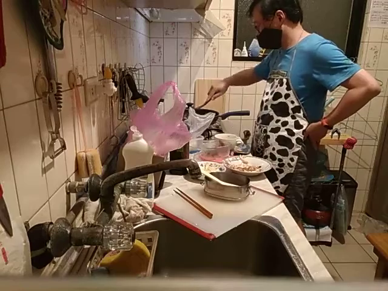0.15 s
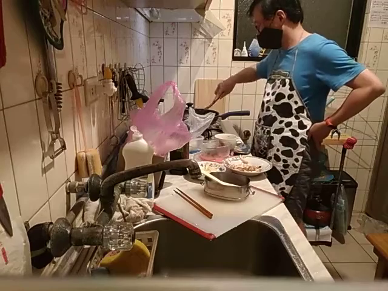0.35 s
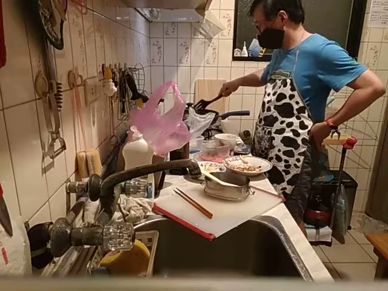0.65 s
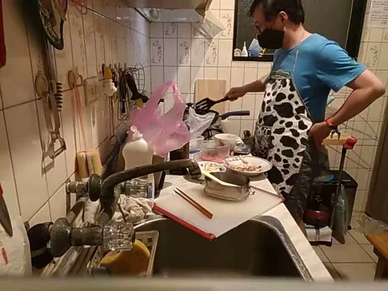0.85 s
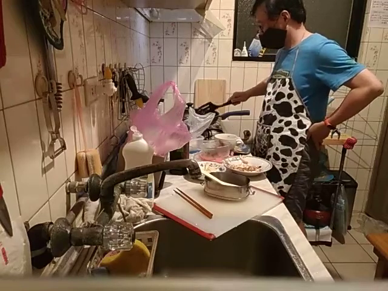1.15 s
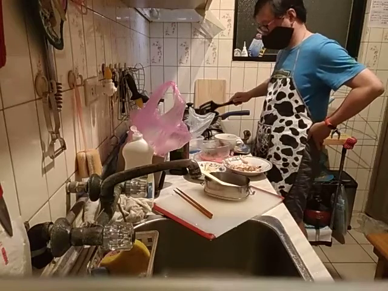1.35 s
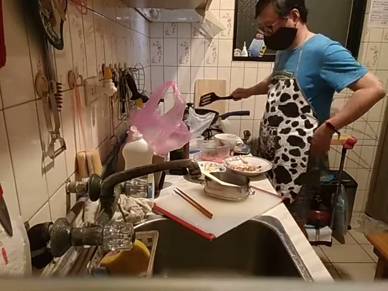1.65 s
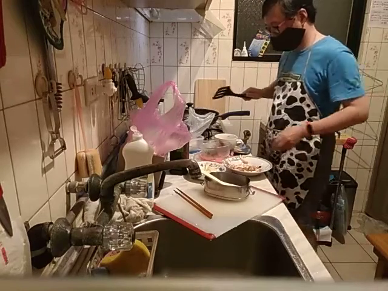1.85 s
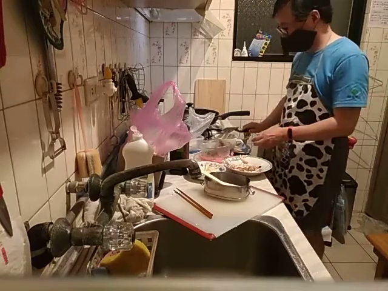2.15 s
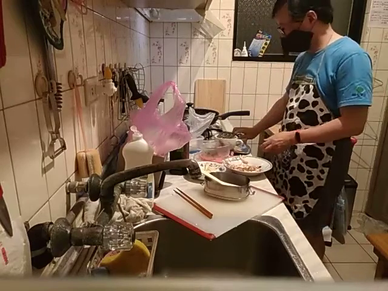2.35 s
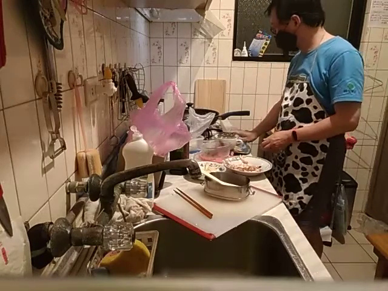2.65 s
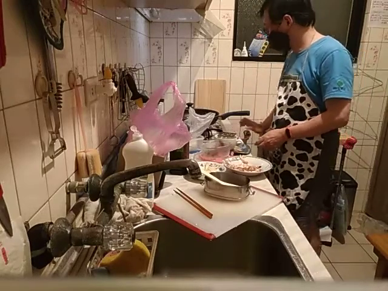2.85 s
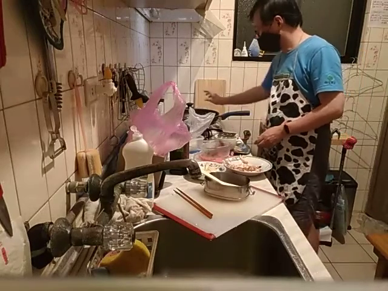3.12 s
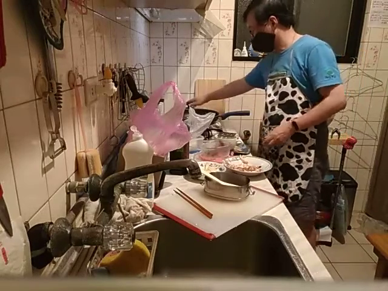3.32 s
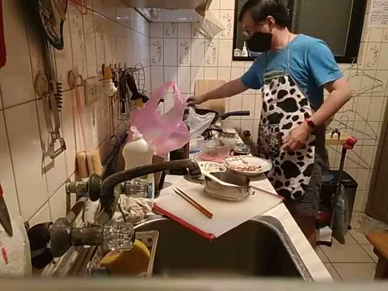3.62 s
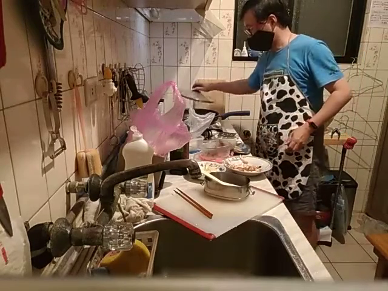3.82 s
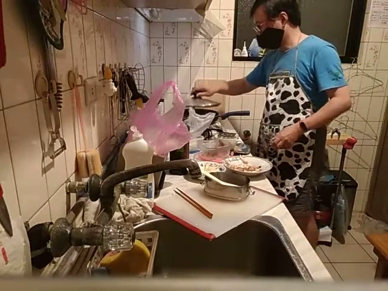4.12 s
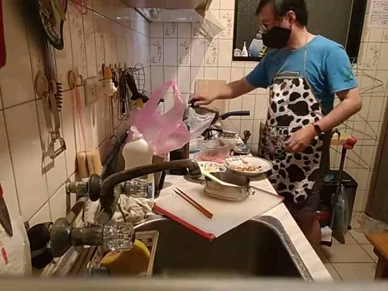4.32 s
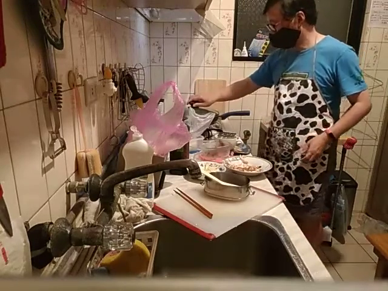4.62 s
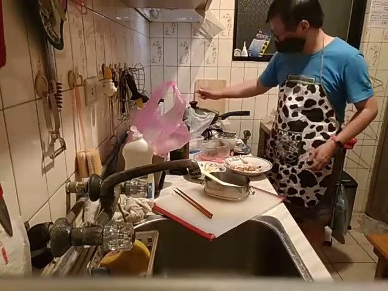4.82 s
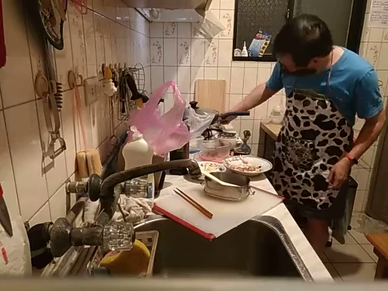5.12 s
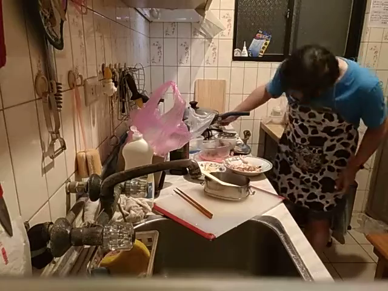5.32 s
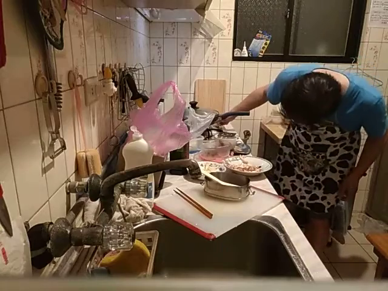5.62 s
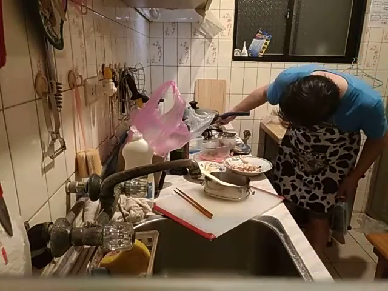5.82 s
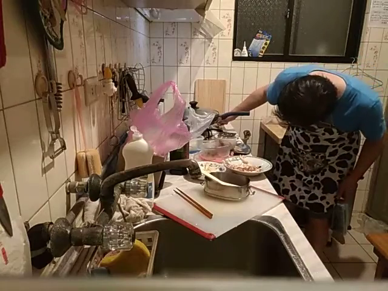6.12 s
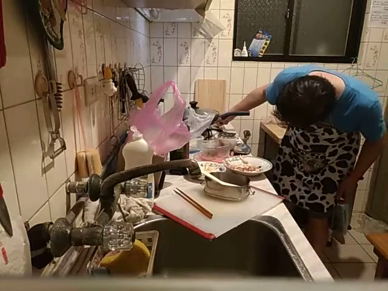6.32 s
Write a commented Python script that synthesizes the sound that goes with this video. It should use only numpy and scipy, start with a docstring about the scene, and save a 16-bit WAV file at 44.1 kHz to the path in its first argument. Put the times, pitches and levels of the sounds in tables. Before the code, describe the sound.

Constant low, breathy hood fan noise with wavering hum covers fine frying hiss. After a light tap come four loud, bright metal clangs, each followed by lower clunks of the rocking pan. A small clink and a solid handle knock follow, then a pause, and a lid clatters into place, muffling the hiss. Room-distance stereo pickup, short hard tile reflections.

```python
"""A small tiled kitchen: an extractor fan of coloured noise and wavering blade tones roars over a sizzling wok.
A spatula touches down, then raps the rim four times, the wok rocking on its stand after each rap.
The spatula is laid down and its handle knocks; last a lid lands and settles, muffling the sizzle.
Every blow rings a set of dying modes, with a burst of noisy clatter, a low counter thud and a tiled room tail."""
import sys
import numpy as np
from scipy import signal
from scipy.fft import rfft, irfft, next_fast_len
from scipy.io import wavfile
from scipy.ndimage import uniform_filter1d

SR = 44100
rng = np.random.default_rng(int(sys.argv[2]) if len(sys.argv) > 2 else 0)


def wav_out(sig):
    """Save sig, one row per channel (or a flat mono array), as 16-bit PCM at SR to the path in sys.argv[1]."""
    wavfile.write(sys.argv[1], SR, np.round(np.clip(np.atleast_2d(sig).T, -1, 1) * 32767).astype(np.int16))


N = 285327

# Fan air roar: (frequency [Hz], relative density [dB per Hz])
ROAR_COLOUR = [(20, -59), (32, -32), (45, -23), (65, -7.5), (108, -1.5), (236, -16.5), (326, -13),
               (410, -17.5), (560, -15.5), (775, -24.5), (1000, -18.5), (1400, -24.5), (1790, -20),
               (2280, -38.5), (4000, -40.5), (8830, -45), (14000, -101)]
# Hood resonances: (frequency [Hz], width [Hz], boost [dB])
HOOD_RESONANCES = [(104.4, 8.5, 5.7), (120.7, 23.4, 4.2), (158, 28, 4.4), (198, 20.5, 8.1),
                   (291, 25.5, 9.8), (364.6, 12.3, 11.4), (492, 49, 6.4), (559, 15.4, 8.9), (669, 136, 8.7),
                   (911.3, 40, 10.8), (1725, 29, 2.7), (2750, 860, 8.6)]
# Fan blade tones: (frequency [Hz], rms level [dB])
BLADE_TONES = [(122, -45), (298, -55), (365, -48.5), (501, -56), (911, -61)]
ROAR_DB = -34.5  # mean level of the air

# Sizzle colour: (frequency [Hz], relative density [dB per Hz])
SIZZLE_COLOUR = [(400, -44), (1000, -15), (2000, 3.5), (3000, 0), (5000, 0.5), (7000, -3), (9300, -1),
                 (10500, -8.5), (13000, -13.5), (15500, -10), (16500, -32)]
# Sizzle colour change under the lid: (frequency [Hz], change [dB])
LID_TREBLE_LOSS = [(2000, -2), (6000, -10), (10000, -9), (12500, -8.5), (14000, -30)]
SIZZLE_DB, MUFFLE_DB = -52, -7.5  # open wok; change under the lid
LID_ON_S, LID_CLOSING_S = 4.12, 0.36  # start of closing; time it takes

# Raps on the rim, each with one bounce: (time [s], level [dB], contact [s], ring [dB],
# brightness [dB per octave], modes the place favours: (frequency [Hz], boost [dB]))
RIM_RAPS = [(0.977, -19.5, 0, -6, 0.76, [(592, 8), (1038, 7), (4721, 3), (5259, 7), (8430, 2)]),
            (.985, -27, 0, 1.5, -0.061, [(446, 11), (592, 20), (1038, 8), (1218, 7), (6260, 8.5)]),
            (1.152, -15.5, 0.0049, -4, -0.62, [(1932, 7.5), (3590, 8.5), (5259, 5)]),
            (1.160, -21.5, 0.0013, 0, -0.8, [(1038, 6), (823, -3), (1140, 6.5), (1218, 6), (5230, 11.5)]),
            (1.341, -13, 0.00042, -12, -0.15, [(1932, 10), (4398, 5)]),
            (1.348, -20.5, 0.0044, 0, -0.59, [(823, 6), (1038, -1.5), (1218, 7), (3590, 9), (4398, 9)]),
            (1.536, -18, 0.0094, -1.5, -0.75, [(1038, -1), (2815, 0), (3590, 8), (5329, 8.5), (8430, 6.5)]),
            (1.544, -20, 0.005, 3, -.7, [(823, 4.5), (1038, 5.5), (1932, 4), (2815, 1.5), (2944, 5),
            (5329, 2)])]
# Rocks on the stand: (time [s], level [dB], clink of upper modes [dB], favoured low mode [Hz], boost [dB])
STAND_ROCKS = [(1.003, -25, -9, 405, 2.7), (1.028, -30, -4, 342, 5.6), (1.042, -40, 0, 570, 4),
               (1.064, -38, -4, 626, 7.2), (1.085, -51, -6, 414, 3), (1.108, -49, -1, 570, 2),
               (1.223, -27.5, 0, 339, 3), (1.234, -31.5, -3, 410, 2), (1.250, -31.5, -1, 632, 6.1),
               (1.284, -38.5, -7, 339, 2.3), (1.420, -25, 2, 414, 1.6), (1.434, -27.5, -6, 565, 1.7),
               (1.458, -29, -9, 635, 1.7), (1.475, -32.5, -11, 414, 2), (1.624, -26, 3.5, 565, 1.8),
               (1.636, -29, -1, 570, 2.3), (1.648, -32.5, -6, 570, 9.6), (1.663, -30.5, -4, 636, 3),
               (1.679, -32, -13, 570, 6.2)]
# Touches of the spatula blade: (time [s], level [dB], brightness [dB per octave], free ringing [s],
# clink of the low mode [dB])
BLADE_RESTS = [(.598, -33.5, -19, 0.0036, -8), (2.295, -38.5, -3.5, 0.025, -0.5),
               (2.316, -36, -4.5, 0.078, -8)]
# Knocks of the spatula handle: (time [s], level [dB])
HANDLE_KNOCKS = [(2.4910, -23.5), (2.507, -31), (2.518, -39), (2.536, -39)]
# Landings of the lid: (time [s], level [dB], brightness [dB per octave], ring [dB], thud [dB],
# free ringing [s], favoured mode [Hz], boost [dB])
LID_LANDINGS = [(4.344, -25, 1.5, 9, -11, 0.012, 400, 3), (4.358, -25.5, 2.4, 9, -11, 0.0062, 400, 3),
                (4.374, -27.5, 1.2, 3.5, -3.5, 0.035, 570, 9.6), (4.430, -31, 1.2, -3, -1, 0.014, 425, 3),
                (4.445, -26, 1.2, -6, -7, 0.01, 568, 10), (4.453, -33.5, 1.8, -6, -21, 0.0093, 1145, 9.8),
                (4.499, -32.5, -0.2, -7, 3, 0.016, 570, 4.3), (4.554, -33.5, 0.26, -6, -6, .018, 1010, 5),
                (4.608, -30, -1.9, 2, -1, 0.0095, 425, 3.3), (4.616, -35, -1.3, 3, 4, 0.017, 572, 11),
                (4.630, -48, 0.081, 1, -8, .015, 637, 7.5)]

# Ringing modes of wok, stand, spatula blade, handle, lid and counter:
# (frequency [Hz], relative level [dB], t60 [s])
WOK_MODES = [(446, -10, .17), (592, -7, .09), (823, -6, .18), (899, -11, .15), (1038, 0, .15),
             (1130, -2, .15), (1218, -5, .15), (1442, -13, .2), (1631, -13, .15), (1701, -11, .14),
             (1841, -11, .16), (1932, -9, .11), (2046, -14, .12), (2121, -12, .2), (2422, -16, .17),
             (2616, -18, .18), (2815, -13, .24), (2944, -13, .2), (3122, -18, .2), (3467, -17, .14),
             (3590, -14, .14), (4398, -11, .1), (4721, -12, .13), (5259, -13, .12), (5329, -13, .13),
             (5814, -19, .15), (6260, -17, .17), (7192, -19, .15), (7396, -18, .14), (7709, -21, .18),
             (8048, -20, .12), (8430, -14, .12), (8532, -17, .13), (8805, -20, .15), (9625, -22, .15),
             (10793, -25, .14)]
STAND_MODES = [(339, -6, .2), (414, -5, .3), (570, -5, .2), (632, -5, .2), (807, -8, .25), (882, -7, .25),
               (1012, -8, .25), (1254, -10, .25), (1684, -11, .2), (1857, -10, .2)]
BLADE_MODES = [(910, -3, .1), (1000, 0, .12), (1835, -7, .9), (4414, -18, .4), (8441, -16, .12),
               (10200, -22, .12)]
HANDLE_MODES = [(387, -5, .08), (909, -2, .13), (1178, -5, .15), (1281, -6, .15), (1356, -4, .15),
                (1442, -4, .15), (1733, -4, .15), (1857, -6, .15), (2350, -8, .08), (2729, -7, .16),
                (3154, -14, .1)]
LID_MODES = [(355, 0, .2), (425, -1, .22), (570, -8, .35), (645, -10, .15), (894, -15, .12),
             (1000, -15, .14), (1150, -21, .2), (1733, -26, .17), (1954, -26, .17), (2200, -26, .15)]
COUNTER_MODES = [(57.7, 2.5, 0.18), (80, 2.5, 0.62), (142.8, -1.5, 0.37), (199, -11.5, 0.36)]
# Clatter of rim, stand, spatula blade, handle and lid: (frequency [Hz], relative density [dB per Hz])
RIM_CLATTER = [(150, -49), (250, -15), (788, -2.5), (922, -16), (1080, 1), (1400, -8.5), (1900, -10.5),
               (2910, -15), (4050, -16.5), (4410, -11.5), (6820, -17), (8550, -16), (10400, -23),
               (16000, -26.5)]
STAND_CLATTER = [(150, -37), (250, -6), (576, -1), (723, -12.5), (922, -13), (1080, -9.5), (1700, -9.5),
                 (8550, -27.5), (14700, -59), (16000, -64)]
BLADE_CLATTER = [(300, -39), (600, -22), (1000, -12), (1800, -23), (2700, -13), (3500, -14), (8400, -11),
                 (11000, -19), (16000, -21)]
HANDLE_CLATTER = [(300, -13), (500, -0.5), (1000, -4), (1800, -5.5), (3000, -13), (3800, -18), (4400, -17),
                  (8400, -17.5), (11000, -33), (16000, -32)]
LID_CLATTER = [(150, -34), (250, -10), (335, -11), (569, -11.5), (687, -18.5), (1020, -21), (1480, -25.5),
               (8970, -38), (14000, -62), (15000, -83)]
CRACK_HZ, CRACK_S, CRACK_DB = 1040, 0.0035, 2  # dull crack of a knock: pitch, decay, level over the knock

# Likeness of the two ports: (frequency [Hz], likeness [-1 to 1])
PORT_LIKENESS = [(60, 0.96), (120, 1), (240, 0.99), (480, 0.95), (950, 0.71), (1890, 0.32), (3770, 0.38),
                 (7520, -0.87), (15000, 1)]
# Left port minus right: (frequency [Hz], difference [dB])
PORT_TILT = [(60, 2), (99, -1), (160, 1), (270, -1), (450, -1), (740, -2), (1220, -1.5), (2010, 2),
             (3330, -2.5), (5500, 0), (9080, -3.5), (15000, 7)]
# Lead of the left port: (frequency [Hz], phase [rad])
LEFT_LEAD = [(60, 0.028), (200, 0.046), (400, 0.66), (800, 0.067), (1460, 2.22), (1800, 0.81), (4200, 1.64)]
EDGE_HZ = 15900  # top of the band


def gain_of(db):
    """Decibels to amplitude."""
    return 10 ** (np.asarray(db) / 20)


def evened(x):
    """Scales to rms 1."""
    return x / np.sqrt(np.mean(x ** 2) + 1e-20)


def read(points, hz):
    """Reads a table on a log-frequency axis."""
    f, value = np.transpose(points)
    return np.interp(np.log(hz + 1), np.log(f + 1), value)


def add(mix, s, sound):
    """Mixes a stereo sound in at time s."""
    part = mix[:, round(s * SR):][:, :sound.shape[1]]
    part += sound[:, :part.shape[1]]


def drift(top_hz):
    """Slow random wander of rms 1: sixteen sines of random phase, the slower ones stronger."""
    t = np.arange(N) / SR
    rates = np.geomspace(top_hz / 30, top_hz, num=16)
    return evened(sum(np.sin(2 * np.pi * (f * t + rng.random())) / np.sqrt(f) for f in rates))


def ports(x, colour_db):
    """Colours two unrelated noises and blends them as the two ports hear a diffuse sound."""
    left, other = rfft(x)
    hz = np.fft.rfftfreq(x.shape[1], 1 / SR)
    same = np.clip(read(PORT_LIKENESS, hz), -1, 1)
    right = same * left + np.sqrt(1 - same ** 2) * other
    right = right * np.exp(-1j * read(LEFT_LEAD, hz))
    return evened(irfft(np.array([left, right]) * gain_of(colour_db(hz)), x.shape[1]))


def fan():
    """Turbulent air through the resonant hood, and blade tones that waver in pitch and level."""
    def colour_db(hz):
        hood_db = sum(db / (1 + (2 * (hz - f) / width) ** 2) for f, width, db in HOOD_RESONANCES)
        return read(ROAR_COLOUR, hz) + hood_db
    air_level = gain_of(ROAR_DB + 0.47 * drift(top_hz=4.5))
    sound = air_level * ports(rng.standard_normal((2, N)), colour_db)
    for hz, db in BLADE_TONES:
        turns = np.cumsum(hz * (1 + 0.00515 * drift(top_hz=11))) / SR
        level = np.sqrt(2) * gain_of(db + 0.93 * drift(top_hz=7.3))
        sound = sound + level * np.sin(2 * np.pi * turns)
    return sound


def sizzle():
    """Dense bursting of fat and water as noise, with larger spits until the lid starts to close and muffle it."""
    t = np.arange(N) / SR
    spits = rng.random(N) < 60 / SR  # about 60 a second
    spits = spits * gain_of(4 * np.minimum(rng.exponential(1, N), 2.5))
    swell = signal.oaconvolve(spits, gain_of(-60 * t[:3000] / 0.078))[:N]  # each spit dies away
    flicker = gain_of(0.7 * drift(top_hz=40))
    bursts = rng.standard_normal((2, N)) * (1 + 0.1 * swell * (t < LID_ON_S)) * flicker
    bare = ports(bursts, lambda hz: read(SIZZLE_COLOUR, hz))
    covered = ports(bursts, lambda hz: read(SIZZLE_COLOUR, hz) + read(LID_TREBLE_LOSS, hz))
    shut = np.clip((t - LID_ON_S) / LID_CLOSING_S, 0, 1)
    return gain_of(SIZZLE_DB) * ((1 - shut) * bare + shut * gain_of(MUFFLE_DB) * covered)


def kitchen(x, t60):
    """Sparse reflections of random sign off the tiles, alike at both ports in the bass."""
    taps = np.zeros((2, SR // 2))
    at = np.arange(0, SR // 2 - 20, 20) + rng.integers(0, 20, (2, SR // 40))  # one in every 20 samples
    np.put_along_axis(taps, at, rng.choice([-1., 1.], at.shape), 1)
    t = np.arange(SR // 2) / SR
    taps = ports(taps, lambda hz: 0 * hz) * gain_of(-60 * t / t60) * (t > 0.004)
    taps = taps / np.linalg.norm(taps[0])
    return signal.fftconvolve(x.mean(0)[None], taps, axes=1)[:, :N]


def ringing(modes, t, colour_db):
    """Dying modes set off almost together; each blow varies their level, pitch, start and phase between ports."""
    ring = 0
    for (hz, db, t60), (late, luck, place, bend) in zip(modes, rng.random((len(modes), 4))):
        lag = np.array([[0], [read(LEFT_LEAD, hz) + 1.1 * (place - 0.5)]])  # phase lag of the right port
        level_db = db + colour_db(hz) + 5 * (luck - 0.5)
        bent_hz = hz * (1 + 0.01 * (bend - 0.5))
        wave = np.sin(2 * np.pi * bent_hz * (t + 0.0006 * late) - lag)
        ring = ring + gain_of(level_db - 60 * t / t60) * wave
    table_power = np.sum(gain_of(np.transpose(modes)[1]) ** 2) / 2
    return ring / np.sqrt(table_power)


def strike(s, level_db, modes, clatter, t60, rise, contact, bright_db, ring_db, thud_db, free, chatter_db,
           grit_db=1.0, places=()):
    """One blow rings the modes, with dense uneven clatter and a low thud through the counter.
    Times in s; bright_db per octave; after free s a touch damps the ring; places are favoured pitches
    (frequency [Hz], boost [dB]); grit_db makes the clatter crackle."""
    t = np.arange(SR // 2) / SR

    def colour_db(hz):
        favour = sum(db / (1 + (np.log2((hz + 1) / f) / 0.04) ** 2) for f, db in places)
        return bright_db * np.log2((hz + 1) / 1000) + favour

    def clatter_db(hz):  # the clatter gathers round the modes
        near = np.max([1 / (1 + ((hz - f) / (20 + 0.012 * f)) ** 2) for f, *_ in modes], axis=0)
        return read(clatter, hz) + colour_db(hz) + 9 * near

    swelling = 1 - np.exp(-t / max(contact / 2, 0.001))  # a longer contact builds the ring more slowly
    damping_db = -60 * np.maximum(t - free, 0) / 0.07
    ring = gain_of(ring_db + damping_db) * swelling * ringing(modes, t, colour_db)

    grains = np.minimum(rng.exponential(1, len(t) // 30 + 1), 4)
    grit = gain_of(grit_db * np.repeat(grains, 30)[:len(t)])  # a new level every 30 samples
    noise = ports(grit * rng.standard_normal((2, len(t))), clatter_db)
    chatter = evened(uniform_filter1d(rng.standard_normal(len(t)), size=130))  # metal chatters on metal
    fade_db = -60 * np.maximum(t - max(contact, 0), 0) / t60
    noise = noise * (1 - np.exp(-t / rise)) * gain_of(chatter_db * chatter + fade_db)

    thud = gain_of(thud_db) * (1 - np.exp(-t / 0.012)) * ringing(COUNTER_MODES, t, np.zeros_like)
    return s - rise, gain_of(level_db) * (noise + ring + thud)


def lid(s, level_db, bright_db, ring_db, thud_db, free, place_hz, place_db):
    """The lid lands and settles on the rim, ringing its own modes with a short clatter."""
    return strike(s, level_db, LID_MODES, LID_CLATTER, t60=0.16, rise=0.0024, contact=0.0059,
                  bright_db=bright_db, ring_db=ring_db, thud_db=thud_db, free=free, chatter_db=1.6,
                  places=[(place_hz, place_db)])


def knock(s, level_db):
    """The handle of the spatula knocks: a short solid crack of two tones along with its ringing body."""
    start, body = strike(s, level_db, HANDLE_MODES, HANDLE_CLATTER, t60=0.14, rise=0.0005, contact=0.0012,
                         bright_db=-1.0, ring_db=-6, thud_db=-34, free=0.016, chatter_db=3.0)
    t = np.arange(body.shape[1]) / SR
    tones = np.sin(2 * np.pi * CRACK_HZ * t) + 0.8 * np.sin(2 * np.pi * 1800 * t)
    crack = np.exp(-t / CRACK_S) * tones
    return start, -body - gain_of(level_db + CRACK_DB) * crack


def rest(s, level_db, bright_db, free, clink_db):
    """The blade of the spatula touches down, its strong ring soon damped by the touch."""
    return strike(s, level_db, BLADE_MODES, BLADE_CLATTER, t60=0.24, rise=0.000895, contact=0.0024,
                  bright_db=bright_db, ring_db=8.5, thud_db=-11, free=free, chatter_db=-0.5,
                  places=[(1000, clink_db), (4414, 1)])


def rock(s, level_db, clink_db, body_hz, body_db):
    """The wok rocks back onto its stand: a gritty scrape, a strong thud and a quickly damped ring."""
    return strike(s, level_db, STAND_MODES, STAND_CLATTER, t60=0.21, rise=0.006, contact=0.016,
                  bright_db=0.84, ring_db=-1.5, thud_db=-3, free=0.02, chatter_db=1.2, grit_db=3.2,
                  places=[(1690, clink_db), (1850, clink_db), (body_hz, body_db)])


def rap(s, level_db, contact, ring_db, bright_db, places):
    """The spatula raps the rim; the place of the blow picks which wok modes stand out."""
    return strike(s, level_db, WOK_MODES, RIM_CLATTER, t60=0.19, rise=0.003, contact=contact,
                  bright_db=bright_db, ring_db=ring_db, thud_db=-20, free=0.3, chatter_db=2.2, grit_db=1.9,
                  places=places)


def scene():
    """Blows with their room tail, over fan and sizzle."""
    blows = np.zeros((2, N))
    for blow, rows in [(rap, RIM_RAPS), (rock, STAND_ROCKS), (rest, BLADE_RESTS),
                       (knock, HANDLE_KNOCKS), (lid, LID_LANDINGS)]:
        for row in rows:
            add(blows, *blow(*row))
    room = gain_of(-9.5) * kitchen(blows, t60=0.25)
    return blows + room + fan() + sizzle()


def record(dry):
    """The ports differ in colour and lose the deep bass; then a steep low-pass limits the band."""
    size = next_fast_len(N)
    hz = np.fft.rfftfreq(size, 1 / SR)
    tilt_db = read(PORT_TILT, hz) / 2  # half up on the left, half down on the right
    bass = 1 / np.sqrt(1 + (40 / (hz + 1)) ** 6)
    tilted = irfft(rfft(dry, size) * bass * gain_of([tilt_db, -tilt_db]), size)[:, :N]
    low_pass = signal.firwin(511, EDGE_HZ, window=("kaiser", 9), fs=SR)
    return signal.oaconvolve(tilted, low_pass[None], "same")


dry = scene()
out = record(dry)
wav_out(out)
```